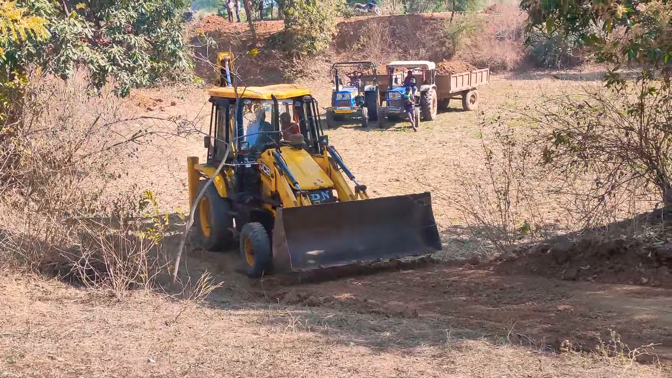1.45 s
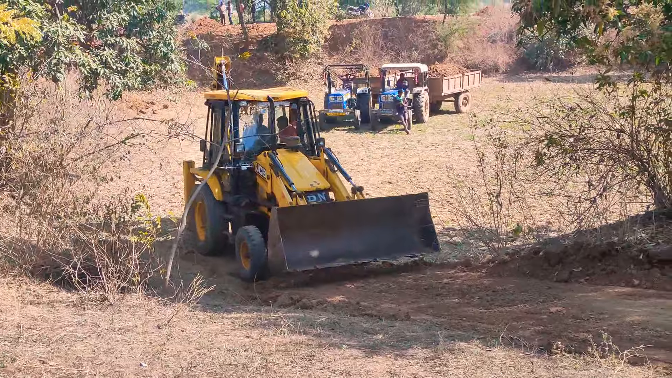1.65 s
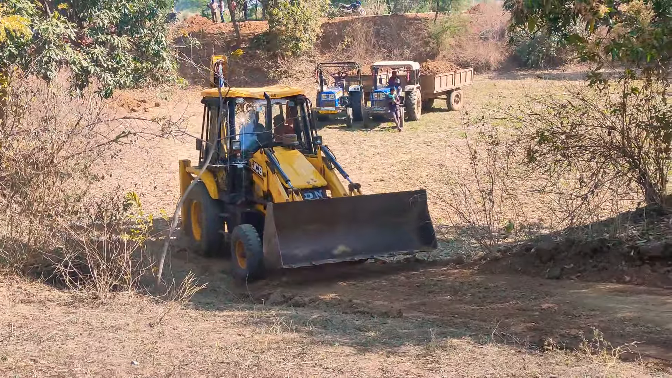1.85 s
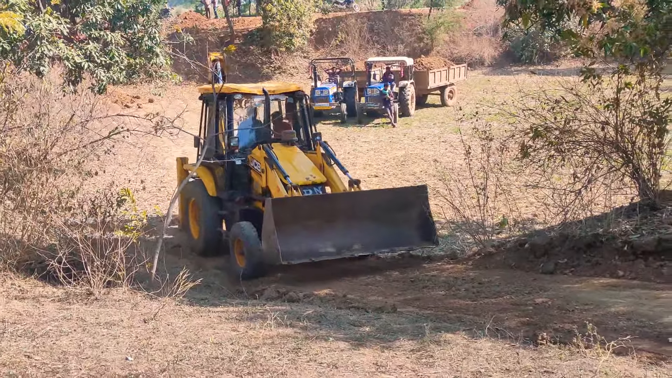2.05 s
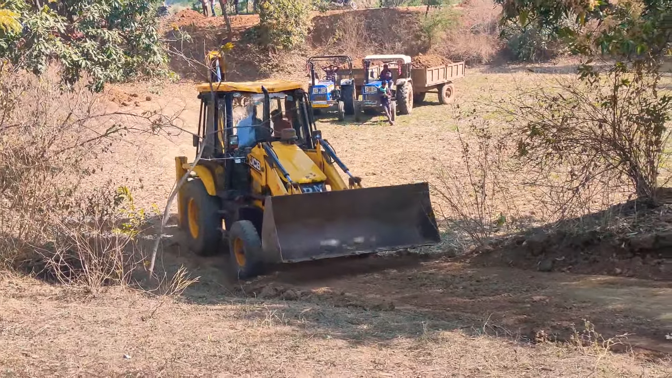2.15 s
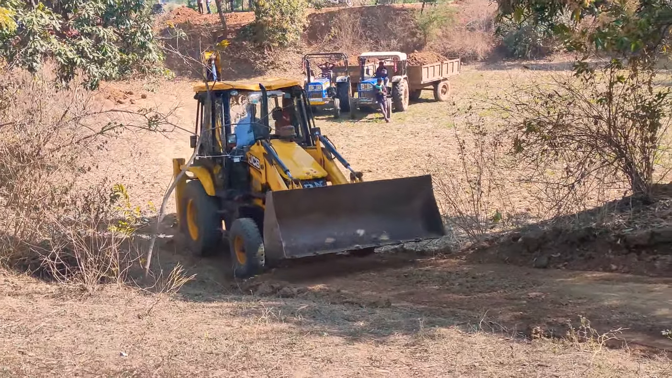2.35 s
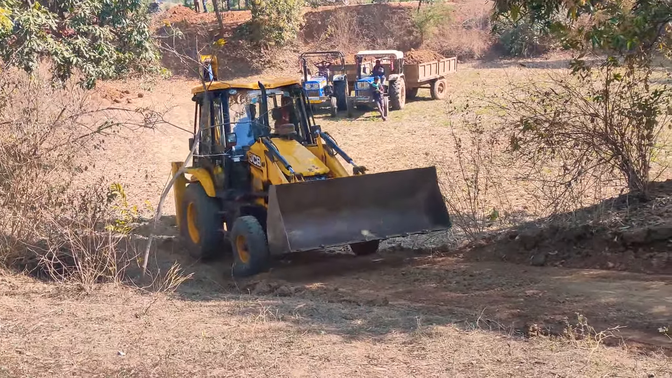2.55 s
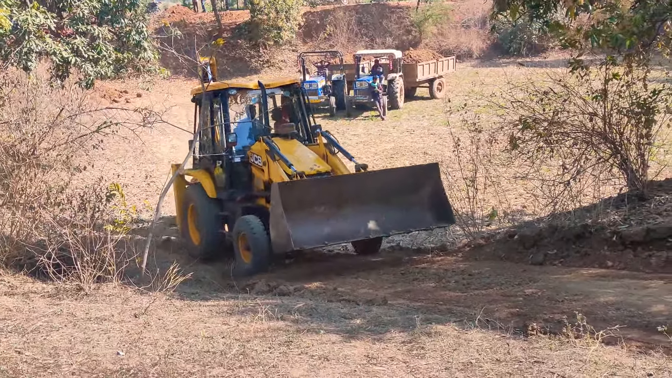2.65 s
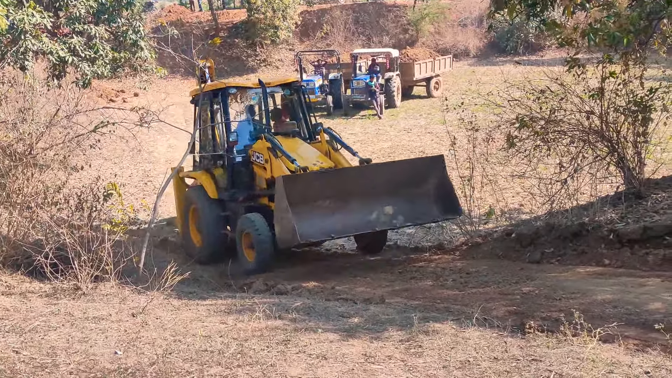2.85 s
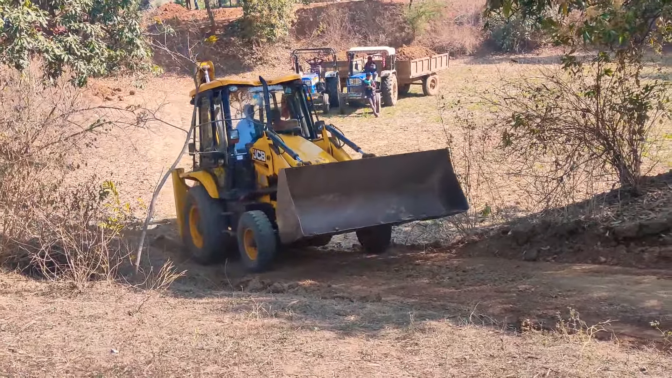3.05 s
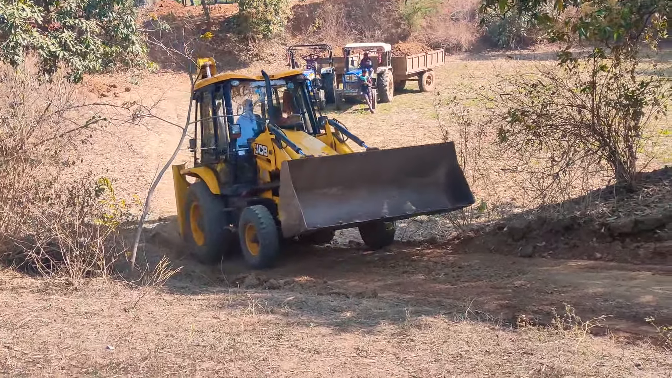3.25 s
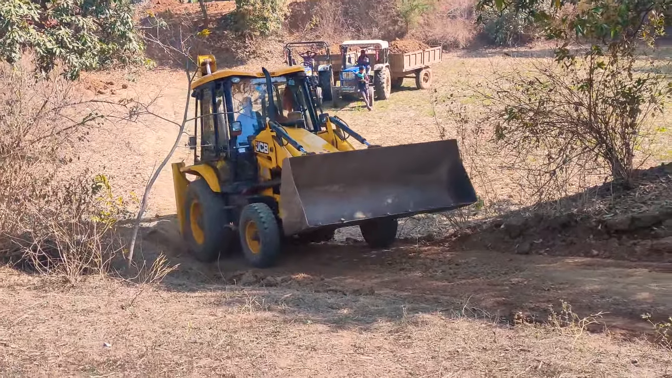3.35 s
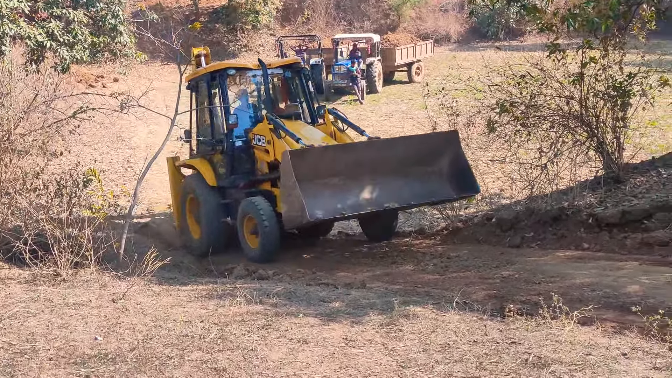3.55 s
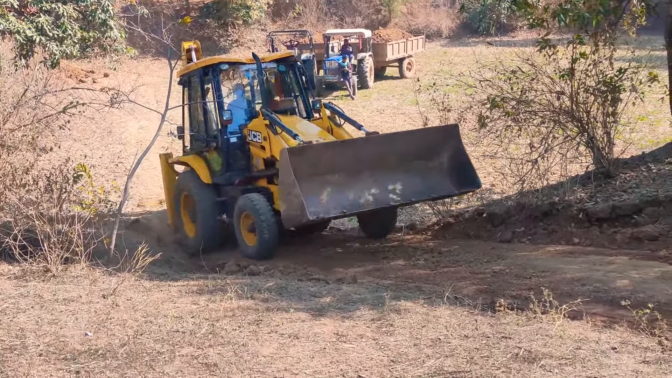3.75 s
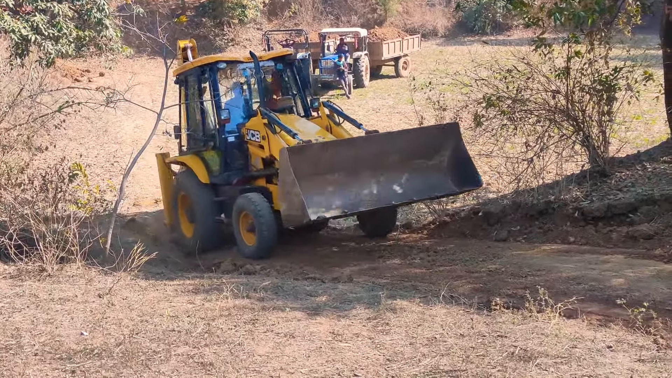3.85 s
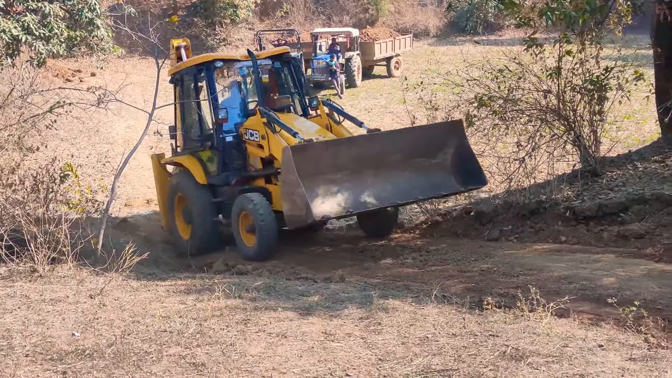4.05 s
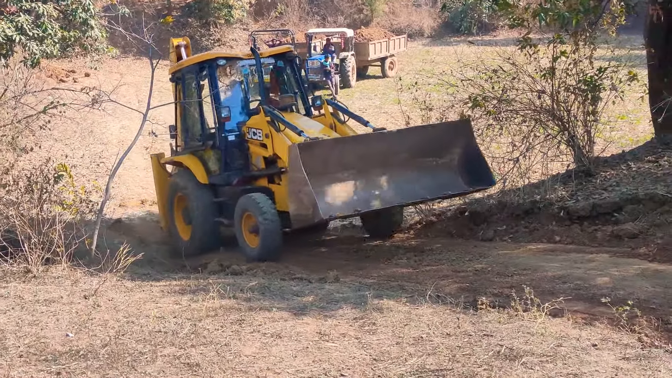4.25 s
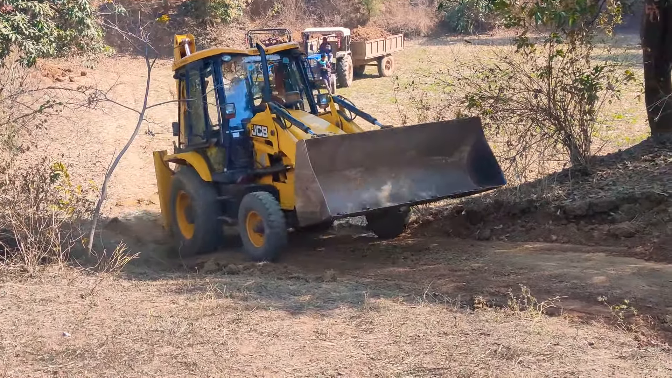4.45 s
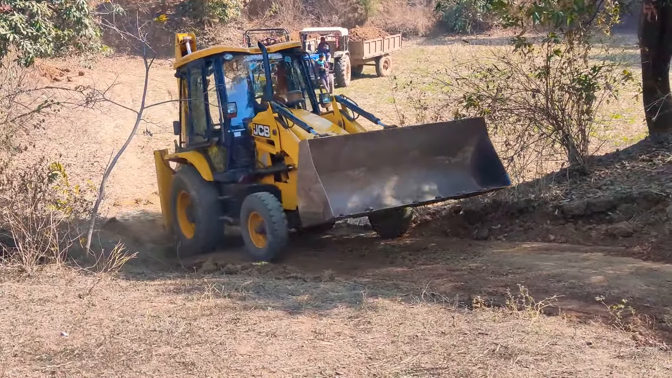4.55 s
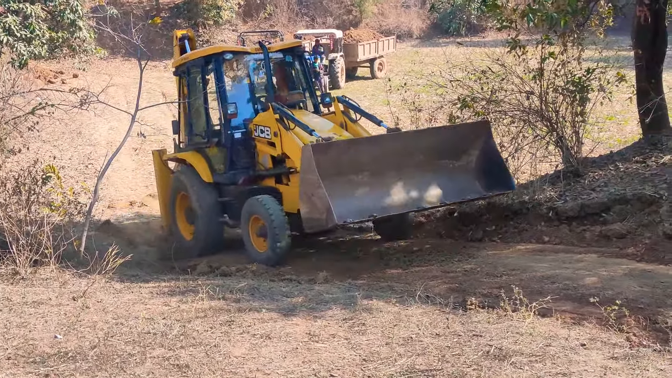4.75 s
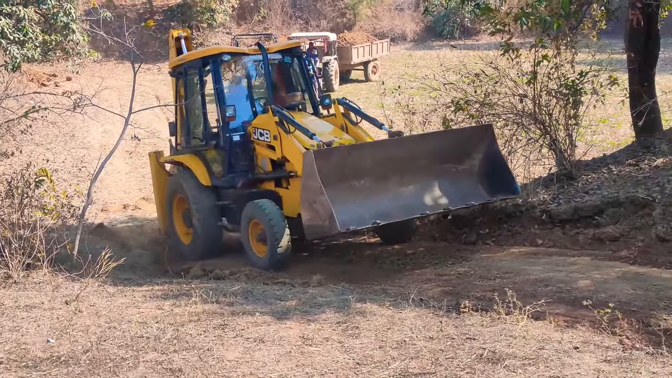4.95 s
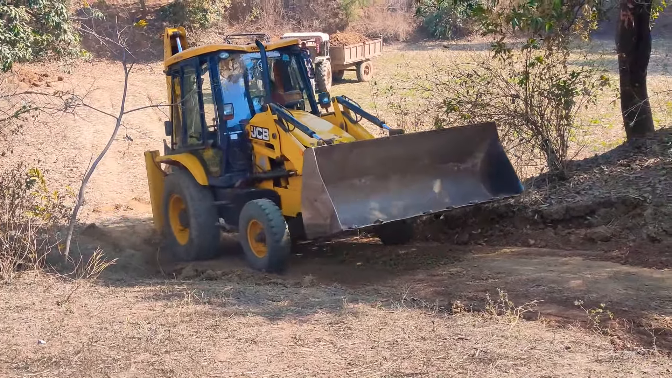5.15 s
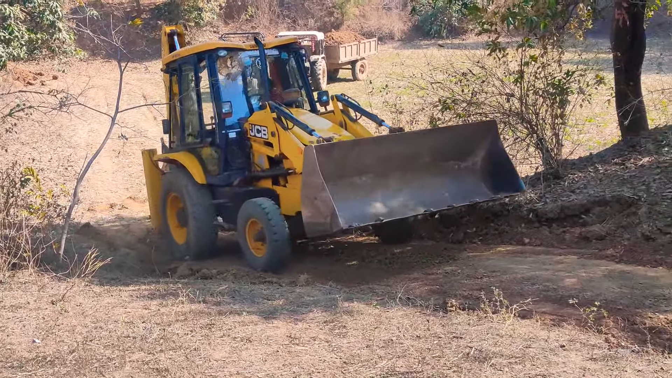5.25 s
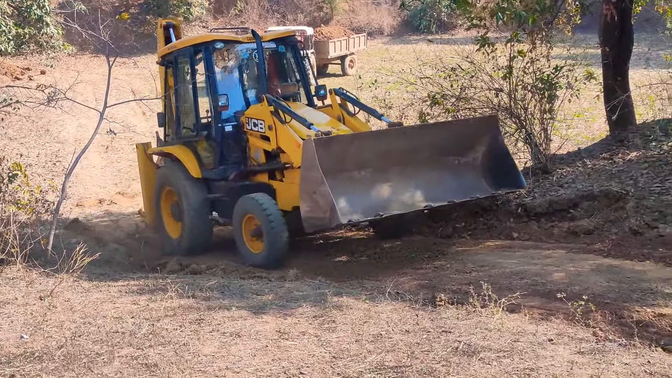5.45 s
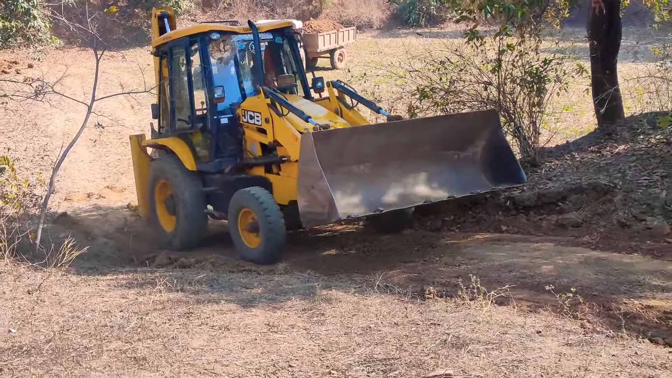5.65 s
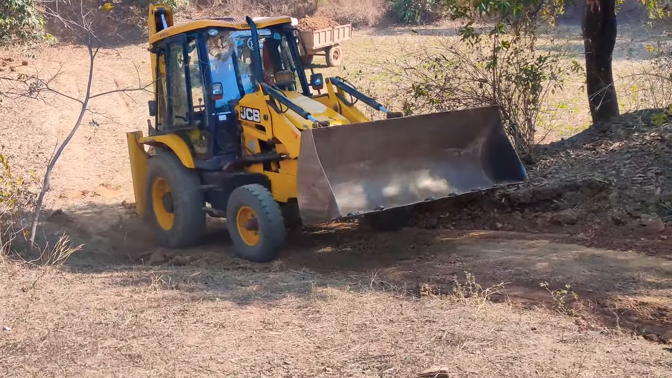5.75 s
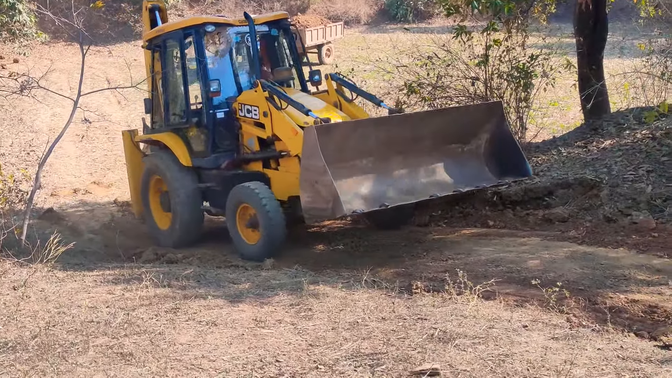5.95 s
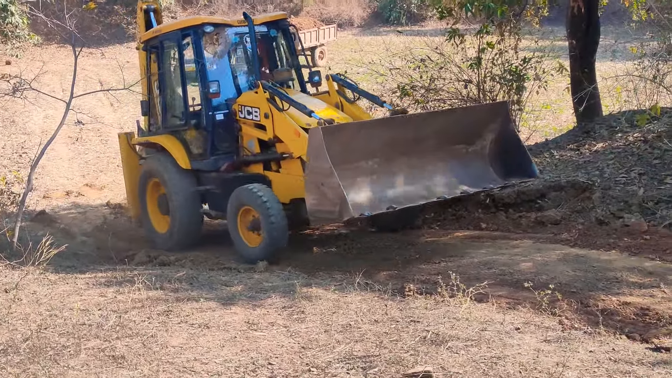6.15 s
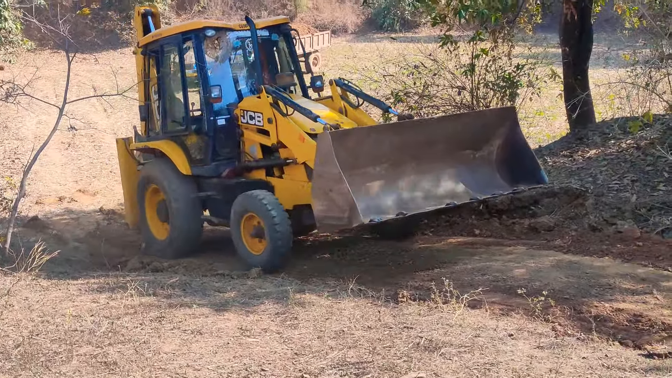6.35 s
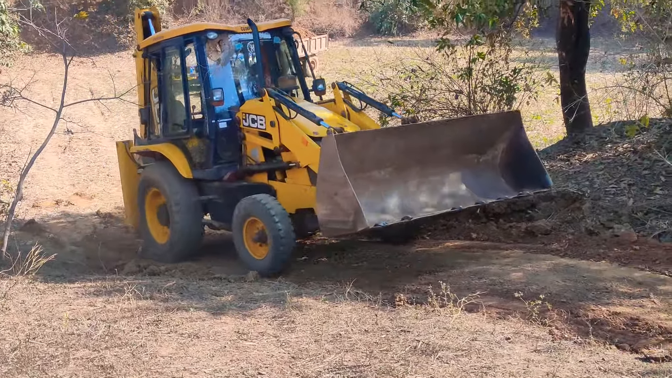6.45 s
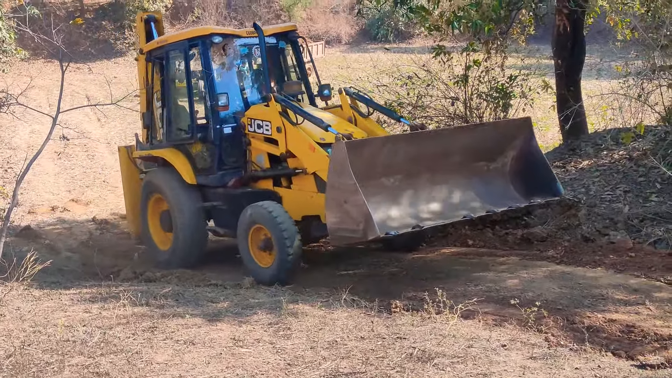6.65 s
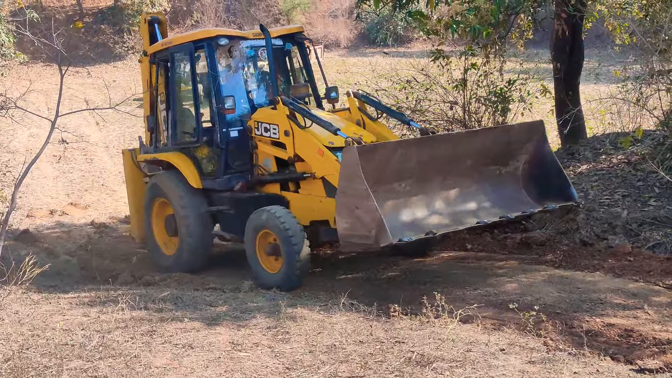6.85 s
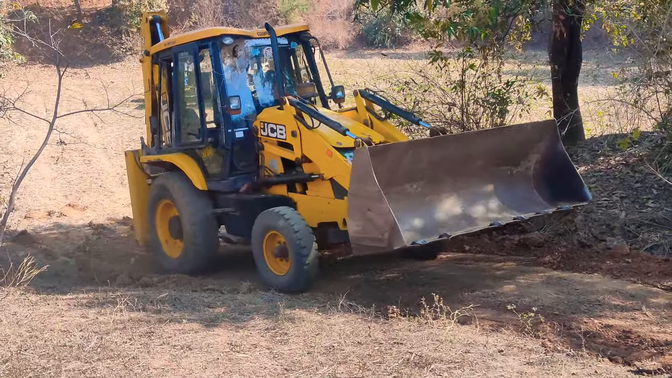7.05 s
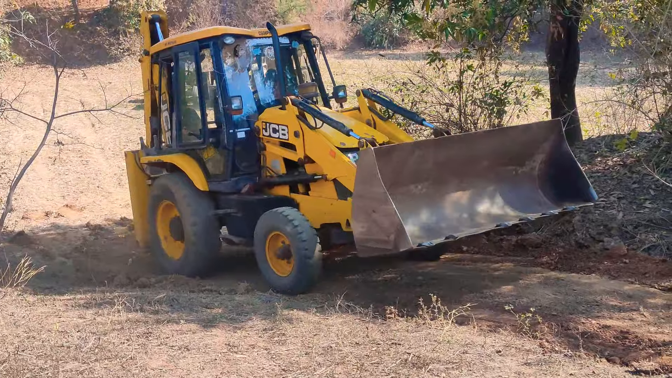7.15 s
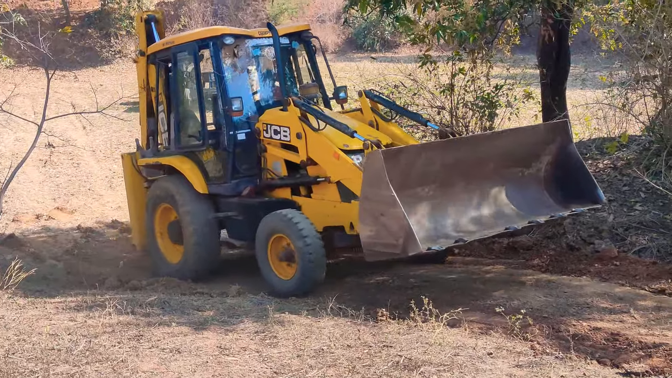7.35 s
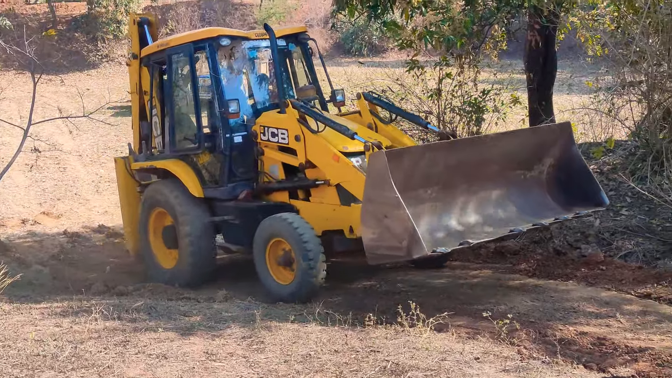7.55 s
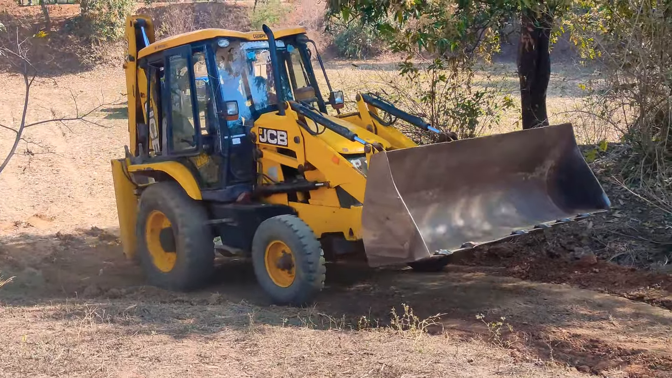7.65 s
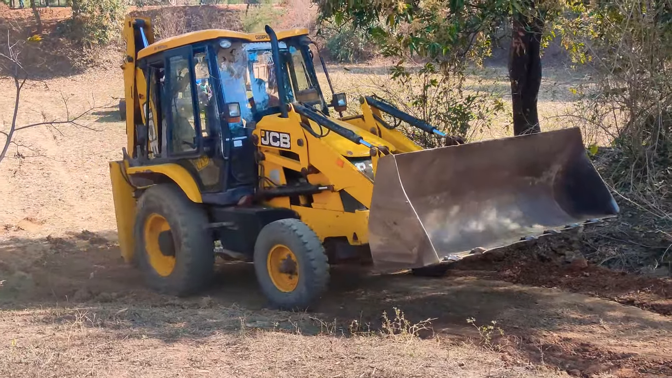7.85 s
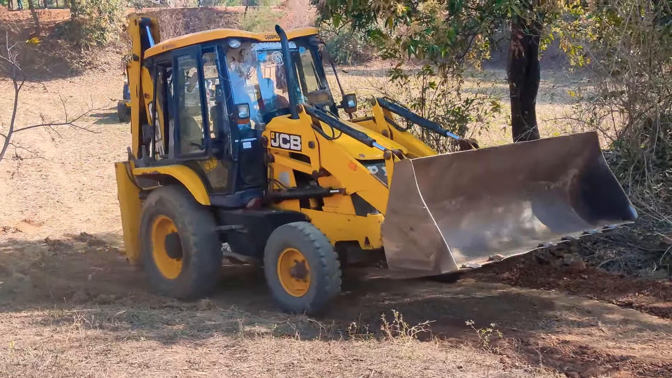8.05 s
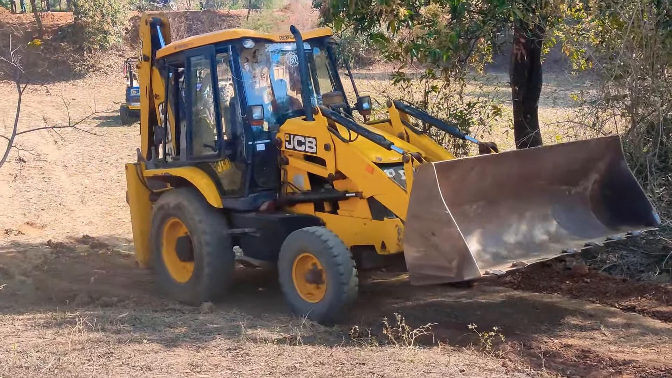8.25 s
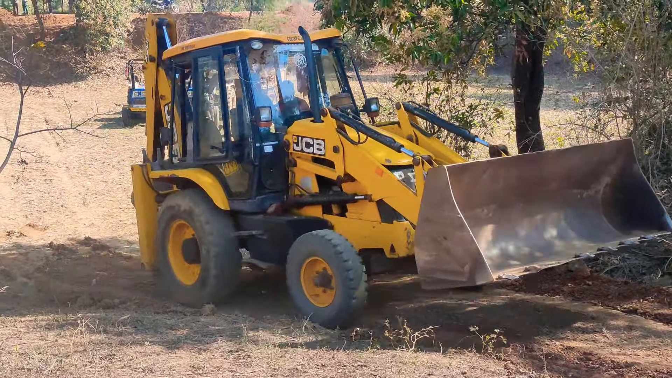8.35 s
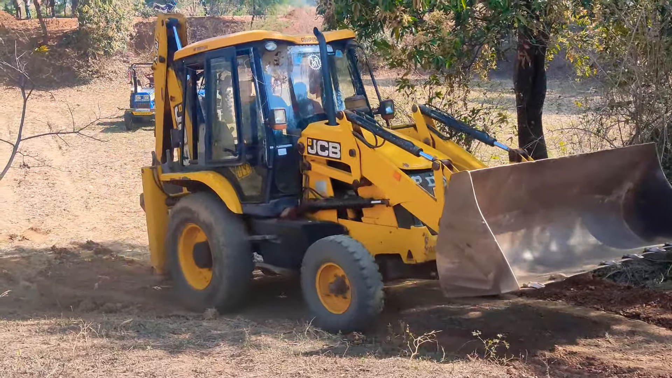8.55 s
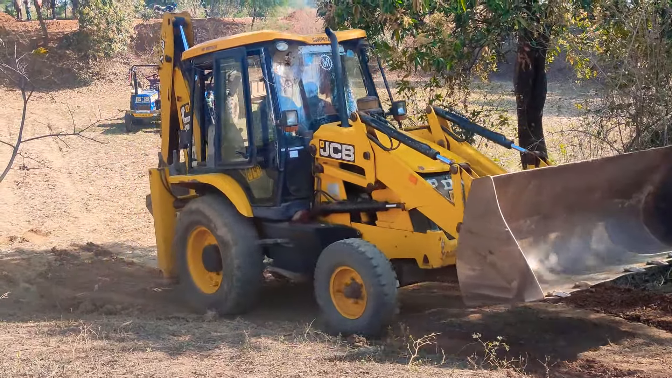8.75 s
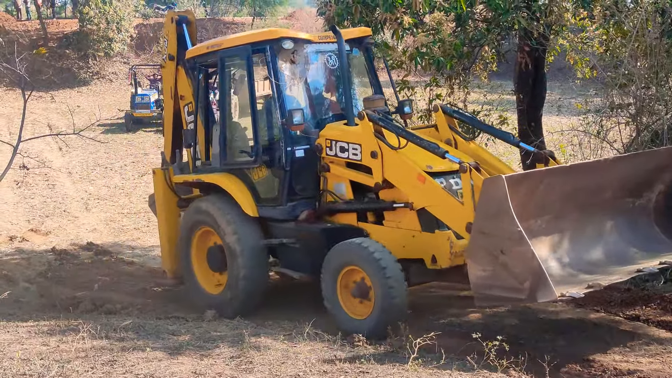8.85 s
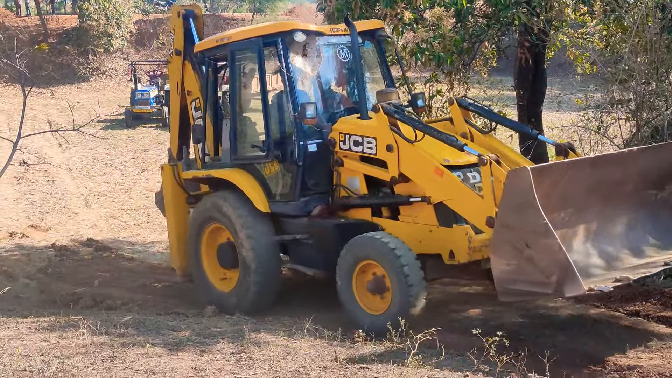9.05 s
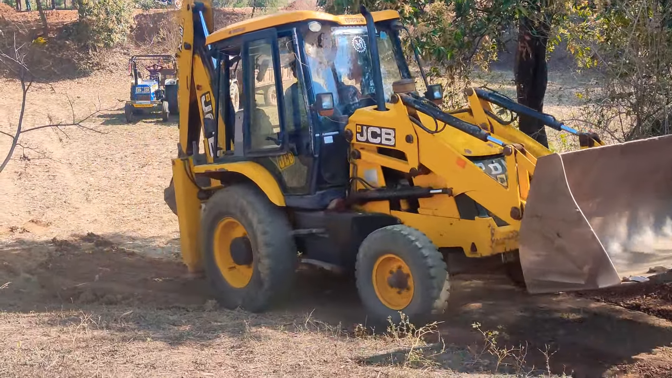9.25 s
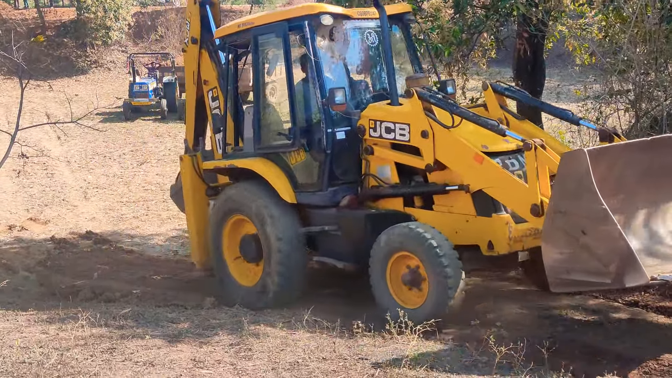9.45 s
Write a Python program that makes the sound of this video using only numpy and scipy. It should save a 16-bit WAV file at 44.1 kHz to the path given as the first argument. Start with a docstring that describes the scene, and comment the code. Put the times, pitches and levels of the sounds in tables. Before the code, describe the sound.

A heavy diesel machine approaches across open ground. The engine climbs to a peak about three and a half seconds in, with a faint fan whine, then settles slightly and holds a fast, rough chug. Clatter, hissy valve noise and loose-metal rattling grow as it nears and turns side-on. Occasional brittle twig snaps sit close to the handheld-like microphone; low bass is filtered out and there is no speech.

```python
"""Backhoe loader nearing over a dry field

A four-cylinder diesel revs up and settles under load as the machine nears and turns its side to the listener.
Uneven firing forces excite resonant casing, panels and bonnet; mode balance follows the side in view.
Damped modes make the hard knocks, casing throbs, clanks of a loose panel and ticks of a loose pin.
A sine on the crankshaft phase makes the fan tone; decaying noise makes dry twigs snap close by."""
import sys
import numpy as np
from scipy import signal
from scipy.fft import rfft, irfft
from scipy.io import wavfile
from scipy.ndimage import uniform_filter1d

SR = 44100
rng = np.random.default_rng(int(sys.argv[2]) if len(sys.argv) > 2 else 0)


def bounce(signal):
    """Save signal as a 16-bit WAV file at the path given by the first command-line argument."""
    frames = np.transpose(np.atleast_2d(signal))
    limited = np.clip(frames, -1, 1)
    pcm = np.round(limited * 32767).astype(np.int16)
    wavfile.write(sys.argv[1], SR, pcm)


N = 418068
TIME = np.arange(N) / SR
TAPS = 4096   # length of every impulse response in samples
HZ = np.maximum(np.arange(TAPS // 2 + 1) * SR / TAPS, 1)
WORKING_SPEED = 55   # firings per s

# engine speed: t/s, firing rate f/Hz
FIRING = [(0.0, 43.88), (0.6, 44.56), (0.9, 48.51), (1.8, 51.55), (2.4, 55.97), (2.7, 56.51), (3.0, 59.01),
          (3.6, 60.47), (3.9, 58.99), (4.2, 60.47), (5.1, 54.96), (5.7, 53.29), (6.6, 54.23), (8.1, 54.73),
          (8.7, 55.2), (9.48, 57.24)]
# side that the machine shows: t/s, aspect (0 head-on, 1 oblique, 2 side-on; held at 2 above that)
ASPECT = [(0, .02), (2.3, 0.14), (3.2, 0.75), (4.4, 1.52), (5.4, 1.69), (6.4, 2.06), (8.4, 2.34),
          (9.4, 1.43)]
# the four cylinders in firing order: relative force in the boom/dB, relative force in the other voices/dB
CYLINDERS = [(1, 2.5), (-4, -3.5), (-0.5, -1), (0.5, 1.5)]
# each engine voice at working speed, full load and 10 m: level head-on/dB, oblique/dB, side-on/dB,
# level per extra firing per s/dB, level lost without load/dB
VOICES = { "exhaust": (-32, -35.5, -33.5, 0.54, 1.5), "boom": (-24.5, -23.5, -22.5, 0.48, 3.5),
          "clatter": (-29, -32, -30.5, 0.39, 0), "hiss": (-39, -36.5, -37, 0.02, 4.5),
          "bonnet": (-34, -33.5, -34.5, 0.91, 7.5), }
# the hardest knocks: t/s, thud relative level/dB, thud f/Hz, panel relative level/dB,
# delay of the ring/s, ring relative level/dB, ring f/Hz
HARD_KNOCKS = [(1.9026, -23.5, 535, -40.5, 0.023, -29.5, 535),
               (2.069, -24.5, 635, -33.0, 0.011, -24.0, 580),
               (2.2897, -21.5, 560, -31.5, 0.011, -29.5, 495),
               (2.3482, -22.0, 550, -35.0, 0.022, -30.5, 570),
               (2.4017, -22.0, 575, -33.5, 0.011, -29.5, 565),
               (2.5431, -20.5, 550, -32.5, 0.013, -29.0, 565),
               (2.9934, -17.0, 555, -31.0, 0.016, -26.0, 550),
               (3.4658, -17.5, 520, -27.5, 0.018, -23.5, 570),
               (3.5296, -17.5, 615, -31.0, 0.011, -22.5, 580),
               (3.5996, -15.5, 540, -35.5, 0.018, -22.0, 580),
               (3.6666, -17.0, 555, -31.0, 0.017, -21.5, 565),
               (3.7968, -14.5, 535, -28.0, 0.011, -20.5, 560),
               (4.0011, -14.5, 540, -31.0, 0.017, -23.5, 585),
               (4.3334, -14.5, 555, -24.0, 0.02, -21.5, 585), (4.4675, -14.0, 595, -30.5, 0.02, -24.5, 535),
               (4.5375, -16.5, 550, -24.5, 0.011, -16.0, 590),
               (4.7982, -16.0, 565, -32.0, 0.023, -21.5, 530),
               (5.2488, -16.0, 550, -29.5, 0.021, -23.5, 560),
               (5.395, -16.0, 555, -29.0, 0.023, -20.0, 580),
               (5.6003, -18.0, 585, -33.5, 0.022, -16.5, 540),
               (5.694, -15.5, 500, -21.5, 0.011, -22.5, 545),
               (5.8279, -16.5, 560, -24.5, 0.019, -19.0, 550),
               (5.9935, -11.5, 575, -28.0, 0.011, -16.5, 585),
               (6.0682, -14.0, 560, -27.0, 0.014, -18.0, 580),
               (6.1423, -16.0, 570, -28.0, 0.021, -21.0, 550),
               (6.3721, -16.5, 600, -28.5, 0.012, -20.0, 595),
               (6.4391, -15.5, 630, -17.5, 0.011, -18.5, 585),
               (6.5137, -14.5, 605, -23.0, 0.012, -17.5, 590),
               (6.5868, -13.5, 565, -26.5, 0.023, -21.0, 565),
               (6.8815, -14.5, 585, -23.0, 0.018, -19.5, 595),
               (7.2512, -12.5, 575, -21.0, 0.018, -19.5, 580),
               (7.3259, -15.0, 575, -27.5, 0.022, -20.0, 600),
               (7.3956, -13.5, 570, -27.0, 0.023, -21.5, 585),
               (7.4696, -15.5, 560, -22.0, 0.011, -22.5, 585),
               (7.6264, -14.5, 590, -33.5, 0.011, -20.5, 585),
               (7.8349, -15.5, 610, -21.5, 0.015, -17.0, 585),
               (7.9821, -8.0, 570, -25.5, 0.017, -15.5, 600),
               (8.1291, -14.0, 615, -21.5, 0.012, -14.0, 600),
               (8.2745, -12.5, 595, -29.0, 0.013, -19.5, 590),
               (8.3502, -15.5, 595, -19.0, 0.018, -16.0, 600),
               (8.4212, -15.0, 600, -20.0, 0.013, -19.0, 590),
               (8.5658, -11.0, 570, -24.5, 0.014, -19.5, 575),
               (8.6454, -14.5, 625, -22.5, 0.011, -22.0, 610),
               (8.7831, -10.5, 570, -26.5, 0.023, -18.0, 590),
               (8.8564, -11.0, 595, -26.5, 0.017, -19.5, 595),
               (9.0701, -14.5, 575, -29.0, 0.017, -14.5, 585),
               (9.3528, -11.5, 580, -24.5, 0.02, -19.5, 610),
               (9.4232, -12.0, 535, -32.0, 0.017, -18.0, 600)]
# swells of the casing: t/s, length/s, peak level/dB, f/Hz
THROBS = [(0.625, 0.02, -28.5, 570), (0.652, 0.018, -30, 570), (0.714, 0.03, -29.5, 565),
          (1.806, 0.011, -23.5, 570), (1.846, 0.018, -26, 570), (1.992, 0.013, -24.5, 570),
          (2.016, 0.013, -24, 580), (2.215, 0.026, -24.5, 540), (2.611, 0.014, -24.0, 580.0),
          (2.652, 0.016, -24.5, 585.0), (2.923, 0.017, -24.0, 545.0), (3.06, 0.013, -19.5, 540.0),
          (3.268, 0.014, -20.5, 575.0), (3.932, 0.016, -20.0, 575.0), (4.197, 0.015, -21.0, 550.0),
          (4.414, 0.015, -20.5, 580.0), (4.603, 0.013, -18.5, 535.0), (4.677, 0.02, -18.5, 595.0),
          (4.742, 0.028, -19.0, 525.0), (4.815, 0.029, -20.5, 575.0), (4.937, 0.013, -19.5, 560.0),
          (4.957, 0.029, -21.0, 585.0), (5.01, 0.013, -21.5, 575.0), (5.173, 0.027, -19.0, 585.0),
          (5.322, 0.016, -20.5, 580.0), (5.468, 0.019, -19.0, 610.0), (5.512, 0.016, -21.0, 605.0),
          (5.541, 0.02, -21.0, 590.0), (6.197, 0.014, -18.5, 565.0), (6.28, 0.026, -20.0, 540.0),
          (6.699, 0.025, -18.5, 605.0), (7.084, 0.027, -19.5, 585.0), (7.147, 0.038, -16.0, 575.0),
          (7.668, 0.013, -19.5, 605.0), (7.69, 0.018, -15.0, 605.0), (8.177, 0.019, -18.5, 555.0),
          (8.244, 0.013, -18.0, 590.0), (8.605, 0.014, -17.5, 615.0), (8.717, 0.014, -17.5, 590.0),
          (8.917, 0.019, -14.5, 590.0), (9.156, 0.014, -17.0, 595.0), (9.189, 0.018, -15.5, 600.0),
          (9.225, 0.015, -17.0, 595.0), (9.256, 0.043, -17.5, 600.0)]
# rattle of the loose pin, its main pitch shifting as it seats in its bush: t/s, level/dB, main f/Hz
PIN_LEVEL = [(0, -72, 2950), (2.8, -61, 2950), (3.2, -50, 2950), (3.8, -52, 3010), (4.2, -59, 3020),
             (4.7, -56, 3030), (5.1, -62, 2960), (5.6, -59, 2890), (6.1, -60, 2900), (6.45, -50, 2930),
             (6.75, -55, 2990), (7.05, -50.5, 2950), (7.7, -55, 2960), (8.1, -48.5, 2970), (8.5, -46, 2950),
             (8.85, -50.5, 3030), (9.1, -62, 3060), (9.35, -48, 3110)]


def exhaust(firings):
    """Overlapping pressure pulses drive silencer resonances: soft puffs merge into a drone."""
    # f/Hz, width/Hz, relative level head-on/dB, oblique/dB, side-on/dB (head-on f is lowered in modes_gain)
    exhaust_modes = [(326.5, 59, 2.5, -1, -2.5), (338, 46, -24, -8, 1), (409, 114, -4.5, -10.5, 4.5)]
    cylinder_db = np.array(CYLINDERS)[:, 1]
    force = strokes(firings, cylinder_db, lead=0.086, rise=0.15, decay=0.46, between=1.0, uneven_db=5.5)
    return radiate(force * contacts(firings, repeat=0.42, apart=0.011), exhaust_modes)


def boom(firings):
    """Amplitude modulation of casing resonance: a chug near 600 Hz, one lump to a firing."""
    # f/Hz, width/Hz, relative level head-on/dB, oblique/dB, side-on/dB (head-on f is lowered in modes_gain)
    casing_modes = [(475, 52, -12.5, -2.5, -8), (553, 99, -7, 1, -6), (606.7, 61, -5.5, 2.5, 3),
                    (724, 270, -17.5, -29, -18.5)]
    ring = radiate(contacts(firings, repeat=0.52, apart=0.0086), casing_modes)
    # compress the random swells so that the beat stands out
    power = uniform_filter1d(np.mean(ring ** 2, axis=0), size=SR // 90)
    steady = ring / (power + 1e-6) ** .33
    cylinder_db = np.array(CYLINDERS)[:, 0]
    beat = strokes(firings, cylinder_db, lead=0.42, rise=0.4, decay=0.5, between=0.05, uneven_db=2.0)
    return spent_on_blows(depth_db=-8) * evened(steady * beat)


def clatter(firings):
    """Forced vibration of panels: sharp combustion blows excite many plate modes."""
    # f/Hz, width/Hz, relative level head-on/dB, oblique/dB, side-on/dB (head-on f is lowered in modes_gain)
    panel_modes = [(1042, 124, -3.5, -13, 3.5), (1238, 77, -0.5, 0.5, -4.5), (1400, 500, -6.5, -1, -11),
                   (1650, 140, -16, -28, -9), (1776, 210, -13, -5.5, -29), (1893, 200, -13.5, -21, -7),
                   (2214, 240, -14, -12, -17.5), (2600, 75, -22, -23, -28), (3010, 220, -29, -19, -18.5),
                   (3060, 1900, -22, -35, -30.5), (876, 300, -4.5, -4, -19)]
    cylinder_db = np.array(CYLINDERS)[:, 1]
    force = strokes(firings, cylinder_db, lead=0.48, rise=0.21, decay=0.34, between=0.36, uneven_db=2.0)
    return radiate(force * contacts(firings, repeat=0.41, apart=0.029), panel_modes)


def hiss(firings):
    """Impact noise of injectors and valve gear; air absorption takes less of the very top as the way shortens."""
    # f/Hz, relative spectral level/dB
    hiss_spectrum = [(2500, 2), (3900, -4.5), (4600, -5.5), (5200, -10.5), (6000, -4), (6700, -1),
                     (7700, -6.5), (9000, -13.5), (11000, -20.5), (13500, -16), (15500, -10)]
    cylinder_db = np.array(CYLINDERS)[:, 1]
    force = strokes(firings, cylinder_db, lead=0.31, rise=0.23, decay=0.19, between=0.3, uneven_db=2.4)
    ring = scattered(impulse_response(spectrum_gain(hiss_spectrum)), scatter_db=-13, scatter_s=.008)
    sound = evened(through(force * contacts(firings, repeat=1.0, apart=1.0), ring))
    top = signal.sosfiltfilt(signal.butter(2, 10500, "high", fs=SR, output="sos"), sound)
    top_gain = from_db(np.interp(TIME, [0, 7, 9.4], [-1, .5, 3.5]))
    return sound + top * (top_gain - 1)


def bonnet(firings):
    """Lightly damped sheets in forced vibration; their modes glide as the machine turns."""
    # width/Hz, f head-on/Hz, f oblique/Hz, f side-on/Hz, relative level head-on/dB, oblique/dB, side-on/dB
    bonnet_modes = [(46.5, 790, 845, 830, 0, -4.5, -4), (50.4, 978, 1030, 995, 0, -4, -6.5),
                    (45, 1180, 1075, 1068, -11, -9, -10)]
    cylinder_db = np.array(CYLINDERS)[:, 1]
    beat = strokes(firings, cylinder_db, lead=0.7, rise=0.2, decay=0.35, between=0.4, uneven_db=2.0)
    force = beat * contacts(firings, repeat=0.54, apart=0.035)
    aspect, out = in_time(ASPECT)[0], 0
    for width, *views in bonnet_modes:
        hz, db = [np.interp(aspect, np.arange(3), column) for column in np.reshape(views, (2, -1))]
        sheet = sliding(sliding(force, hz, width), hz, width)
        out = out + from_db(db) * evened(sheet)
    return out


def spent_on_blows(depth_db):
    """Energy sharing: a firing that knocks or throbs hard leaves less for the ordinary beat (returns a gain)."""
    busy = np.zeros(N)
    spans = [(s - .012, late + .02) for s, _, _, _, late, *_ in HARD_KNOCKS]
    spans += [(s - .005, length + .01) for s, length, *_ in THROBS]
    for s, length in spans:
        busy[int(s * SR):int((s + length) * SR)] = 1
    return from_db(depth_db * uniform_filter1d(busy, size=SR // 150))


def knocks(firings, thud_rise_s, ring_s, thud_gain_db, ring_gain_db, panel_gain_db):
    """Impact excitation: a short, dull thud clanks the loose panel, then the casing rings on."""
    panel_hz = 1090
    out = np.zeros(N)
    for s, thud_db, thud_hz, panel_db, late, ring_db, ring_hz in knock_events(firings):
        add(out, s, struck(thud_db + thud_gain_db, thud_hz, thud_rise_s))
        add(out, s, clank(panel_db + panel_gain_db, panel_hz * (1 + 0.06 * rng.standard_normal())))
        # a swell peaks in the middle of three lengths
        add(out, s + late - 3 * ring_s / 2, swell(ring_db + ring_gain_db, ring_hz, ring_s))
    return out


def knock_events(firings):
    """Random excitation: lighter knocks fall by chance on the beat, clear of the listed hard ones."""
    # cylinders in firing order: chance head-on, chance from the oblique view onwards
    knock_chance = [(.2, .15), (.05, .02), (0.75, .02), (.08, .08)]
    lead = 0.2503   # firing intervals
    over_boom_db, spread_db, speed_db = 3, 5, 0.2   # speed_db is per extra firing per s
    panel_db, ring_db = -17, -14   # against the thud
    knock_hz, ring_late_s = 538, 0.01211
    number = (firings + lead).astype(int)
    at = np.flatnonzero(np.diff(number)) + 1
    luck = rng.random(size=1024)[number[at]]
    size = rng.standard_normal(size=1024)[number[at]]
    head_on, turned = np.array(knock_chance)[number[at] % 4].T
    chance = head_on + (turned - head_on) * np.clip(in_time(ASPECT)[0][at], 0, 1)
    hard_s = np.array(HARD_KNOCKS)[:, 0]
    free = np.abs(TIME[at, None] - hard_s).min(axis=1) > 1 / WORKING_SPEED
    db = level_db("boom")[at] + over_boom_db + spread_db * size
    db = db + speed_db * (in_time(FIRING)[0][at] - WORKING_SPEED)
    light = np.broadcast_arrays(TIME[at], db, knock_hz, db + panel_db, ring_late_s, db + ring_db, knock_hz)
    return np.vstack([HARD_KNOCKS, np.column_stack(light)[free & (luck < chance)]])


def throbs(gain_db):
    """Resonance: some firings catch the casing and make it swell."""
    out = np.zeros(N)
    for s, length, db, hz in THROBS:
        add(out, s - length, swell(db + gain_db, hz, length))
    return out


def clanks(gain_db):
    """Repeated impact: the loose panel is thrown against its frame at listed times."""
    # t/s, relative level/dB, f/Hz
    clank_events = [(2.8582, -28.0, 1105.0), (3.131, -28.0, 1155.0), (3.1999, -28.5, 1145.0),
                    (3.8429, -28.5, 1180.0), (3.9294, -28.5, 1230.0), (4.0709, -27.5, 1160.0),
                    (4.138, -27.5, 1090.0), (4.2014, -26.5, 1135.0), (4.2525, -25.0, 1150.0),
                    (4.6714, -28.0, 1035.0), (4.8857, -27.5, 1050.0), (4.955, -25.0, 1065.0),
                    (5.0304, -27.0, 1240.0), (5.0667, -26.5, 1060.0), (5.1042, -23.5, 1095.0),
                    (5.284, -24.5, 1080.0), (5.3578, -27.0, 1070.0), (5.4685, -26.0, 1060.0),
                    (5.5426, -24.0, 1040.0), (5.6171, -26.5, 1155.0), (5.6776, -26.0, 1070.0),
                    (5.8415, -23.0, 1075.0), (5.9181, -26.0, 1135.0), (6.0308, -25.0, 1060.0),
                    (6.2141, -24.5, 1075.0), (6.3276, -23.5, 1090.0), (6.4021, -24.0, 1075.0),
                    (6.6589, -21.5, 1075.0), (6.7179, -22.5, 1035.0), (6.773, -23.5, 1065.0),
                    (6.8058, -22.0, 1080.0), (6.9539, -19.0, 1045.0), (7.027, -22.5, 1125.0),
                    (7.0651, -19.5, 1100.0), (7.2333, -24, 1070), (7.5055, -21.5, 1030.0),
                    (7.617, -21.5, 1100), (7.6512, -19.0, 1080.0), (7.7627, -22.5, 1085.0),
                    (7.7964, -22.5, 1045.0), (7.8736, -22.5, 1040.0), (7.9089, -20.5, 1065.0),
                    (7.9444, -21.5, 1105.0), (8.0547, -22.5, 1090.0), (8.2904, -22.5, 1105.0),
                    (8.4904, -22.0, 1050.0), (8.635, -20.0, 1090.0), (8.709, -24.0, 1055.0),
                    (9.0121, -25.5, 1055.0), (9.1374, -21.0, 1085.0), (9.2432, -26.5, 1130.0),
                    (9.3938, -26.0, 1050.0), (9.4356, -25.5, 1165.0)]
    out = np.zeros(N)
    for s, db, hz in clank_events:
        add(out, s, clank(db + gain_db, hz))
    return out


def clank(db, hz):
    """Modal superposition: one hit of the loose panel sums damped partials, round and hollow."""
    # frequency ratio to the main pitch, relative level/dB
    clank_modes = [(1, 0), (1.12, -13), (1.8, -19), (2.8, -27)]
    return sum(struck(db + mode_db, hz * ratio, rise_s=0.0025) for ratio, mode_db in clank_modes)


def struck(db, hz, rise_s):
    """Heavy damping: a mode swells to its peak and quickly dies."""
    age = TIME[:SR // 20]
    envelope = (age / rise_s * np.exp(1 - age / rise_s)) ** 1.4
    return from_db(db) * envelope * np.sin(2 * np.pi * (hz * age + rng.random()))


def swell(db, hz, length_s):
    """Phase-modulated resonance: a rounded, slightly unsteady ring in the middle of three times its length."""
    age = TIME[:int(3 * length_s * SR)] - 1.5 * length_s
    wobble = np.interp(age, np.linspace(-.08, .08, 32), rng.standard_normal(32))
    envelope = np.exp(-.4 * np.abs(2 * age / length_s) ** 3)
    return from_db(db) * envelope * np.sin(2 * np.pi * (hz * age + rng.random()) + .45 * wobble)


def pin(firings, share, uneven_db, late_s, width_hz, upper_db):
    """Impulse excitation: some firings shake a loose pin in the loader arm, whose modes answer with a tick."""
    # upper modes: f/Hz, width/Hz, relative level/dB
    pin_modes = [(3050, 52, 8), (3400, 160, -9), (3980, 100, -13), (6400, 310, -12), (7280, 230, -7)]
    at = np.flatnonzero(np.diff(firings.astype(int)))
    chance, size, delay = rng.random((len(at), 3)).T
    tick_at = np.minimum(at + (delay * late_s * SR).astype(int), N - 1)
    ticks = np.zeros(N)
    ticks[tick_at] = (chance < share) * from_db(uneven_db * size)
    upper_gain = sum(from_db(db) / (1 + (2 * (HZ - hz) / width) ** 2) for hz, width, db in pin_modes)
    main_hz = in_time(PIN_LEVEL)[1]
    main = sliding(sliding(ticks + 1e-18, main_hz, width_hz), main_hz, width_hz)
    upper = through(ticks, impulse_response(upper_gain))
    return rms_one(rms_one(main) + from_db(upper_db) * rms_one(upper))


def fan(firings, waver_db):
    """Blade-passing tone: its frequency is locked to the crankshaft and its level wavers a little."""
    blades_per_firing = 21 / 4
    knots = np.arange(0, TIME[-1] + 1, .06)
    waver = from_db(waver_db * np.interp(TIME, knots, rng.standard_normal(len(knots))))
    return np.sqrt(2) * np.sin(2 * np.pi * blades_per_firing * firings) * waver


def snaps(crack_s, rustle_s, grain_db, ring_hz, ring_width_hz, ring_db):
    """Brittle fracture: dry twigs crack in bursts of noise, then a short, grainy rustle rings the stalks."""
    # t/s, relative crack level/dB, rustle level against the crack/dB
    snap_events = [(0.194, -30.5, -23), (0.331, -40, -12), (1.0428, -21, -15.5), (4.057, -27, -18),
                   (5.758, -38, -18)]
    # f/Hz, relative spectral level/dB
    snap_colour = [(300, -3), (1000, 5), (3000, -1), (4400, 2), (5500, 1.5), (7000, 7.5), (10000, -3),
                   (13000, -6), (15500, -2)]
    crack, rustle = np.zeros((2, N))
    for s, db, rustle_db in snap_events:
        start = int(s * SR)
        age = TIME[:N - start][:SR // 2]
        grains = from_db(grain_db * np.interp(age, np.arange(0, .5, .002), rng.standard_normal(250)))
        crack[start:][:len(age)] += from_db(db) * np.exp(-age / crack_s)
        rustle[start:][:len(age)] += from_db(db + rustle_db) * grains * np.exp(-age / rustle_s)
    noise = rng.standard_normal((2, N))
    b, a = signal.iirpeak(ring_hz, ring_hz / ring_width_hz, fs=SR)
    stalks = from_db(ring_db) * signal.lfilter(b, a, rustle * noise)
    return through((crack + rustle) * noise + stalks, impulse_response(spectrum_gain(snap_colour)))


def strokes(firings, cylinder_db, lead, rise, decay, between, uneven_db):
    """Periodic forcing: each firing swells and dies over a steady churn; times are shares of a firing interval."""
    phase = firings + lead + 1
    number, age = np.maximum(phase.astype(int), 1), phase % 1
    count = np.arange(1024)
    unevenness_db = uneven_db * rng.standard_normal(len(count))
    strength = from_db(np.asarray(cylinder_db)[(count - 1) % 4] + unevenness_db)

    def shape(a):
        return (1 - np.exp(-(a / rise) ** 2)) * np.exp(-a / decay)

    # the stroke before is still dying away
    return between + strength[number] * shape(age) + strength[number - 1] * shape(age + 1)


def contacts(firings, repeat, apart):
    """Cyclic correlation: one share of the chatter recurs every four firings; apart is each side's own share."""
    size = 4096
    place = firings / 4 * size % size
    patterns = irfft(np.exp(2j * np.pi * rng.random((2, size // 2 + 1))))
    first, second = [np.interp(place, np.arange(size), rms_one(p)) for p in patterns]
    turn = 1.292 * TIME   # rad; the recurring pattern changes slowly as the machine moves
    repeat, apart = np.clip(repeat, 0, 1), np.clip(apart, 0, 1)
    recurring = first * np.cos(turn) + second * np.sin(turn)
    common = np.sqrt(repeat) * recurring + np.sqrt(1 - repeat) * rng.standard_normal(N)
    return np.sqrt(1 - apart) * common + np.sqrt(apart) * rng.standard_normal((2, N))


def radiate(force, modes):
    """Directivity: the balance of the resonances follows the side in view; slow level 1."""
    aspect, out = np.clip(in_time(ASPECT)[0], 0, 2), 0
    for view in range(3):
        ring = scattered(impulse_response(modes_gain(modes, view)), scatter_db=-9, scatter_s=.005)
        out = out + np.maximum(1 - np.abs(aspect - view), 0) * through(force, ring)
    return evened(out)


def modes_gain(modes, view):
    """Power sum of steep-sided resonance curves in one of the three views."""
    hz = HZ / (0.96 if view == 0 else 1)   # head-on, the peaks sit a little lower
    power = sum(from_db(db[view]) ** 2 / (1 + (2 * (hz - centre) / width) ** 2) ** 2
                for centre, width, *db in modes)
    return np.sqrt(power)


def level_db(voice):
    """Spherical spreading: level falls with distance; speed, load and the side in view set it too."""
    # t/s, load (0 to 1)
    load_curve = [(0.5, 0.44), (.66, 0.76), (1.4, 0.68), (1.8, 1), (3.0, 0.83), (4.3, 0.55), (5.4, 0.38),
                  (6.9, 0.53), (7.8, 0.57), (9.4, 1)]
    # t/s, distance/m
    distance_curve = [(0, 26.5), (2.4, 28.7), (4.2, 16.5), (6.6, 11.2), (9.4, 11.5)]
    *view_db, speed_db, load_db = VOICES[voice]
    speed, load, metres, aspect = [in_time(curve)[0] for curve in (FIRING, load_curve, distance_curve, ASPECT)]
    effort_db = speed_db * (speed - WORKING_SPEED) + load_db * (load - 1)
    return np.interp(aspect, np.arange(3), view_db) + effort_db - 20 * np.log10(metres / 10)


def over_ground(x, width_hz):
    """Interference: the bounce off the ground changes a narrow band that moves with the machine."""
    # t/s, f/Hz, gain in the band/dB (mostly a cut, once a slight boost)
    ground_band = [(0, 1540, -15), (2.4, 1550, -8), (4.3, 1630, -17), (5.5, 1570, -16), (6.6, 1610, -10),
                   (7.6, 1483, 2.5), (9.4, 1440, -6.5)]
    hz, band_db = in_time(ground_band)
    return x - (1 - from_db(band_db)) * sliding(x, hz, width_hz)


def scattered(ring, scatter_db, scatter_s):
    """Scattering: cab, arms and bucket throw back a brief, bright cloud of echoes, made of decaying noise."""
    burst = rng.standard_normal(TAPS) * np.exp(-TIME[:TAPS] / scatter_s)
    cloud = signal.sosfilt(signal.butter(2, 1500, "high", fs=SR, output="sos"), burst)
    cloud = cloud / np.sqrt(np.sum(cloud ** 2))
    return ring + from_db(scatter_db) * signal.fftconvolve(ring, cloud)[:TAPS]


def shaded(right):
    """Interaural differences: the right side comes later, shaded from the treble, at a drifting level."""
    # f/Hz, right minus left level/dB
    shade_curve = [(300, 0.2), (430, -1), (600, -0.25), (1000, -0.5), (1250, -1), (1500, 1), (2400, 0.5),
                   (3200, -5), (4200, -8), (5200, -13), (6700, -21.5), (10000, -16), (15000, -21)]
    # level at the start/dB, level at the end/dB
    drift_db = (-1.7, -0.7)
    lag_s = 0.00013
    shade = irfft(spectrum_gain(shade_curve) * np.exp(-2j * np.pi * HZ * lag_s))
    right = signal.oaconvolve(right, np.roll(shade, TAPS // 2))[TAPS // 2:][:N]
    return right * from_db(np.linspace(*drift_db, N))


def sliding(x, hz, width_hz):
    """Heterodyne resonance: its centre moves from sample to sample; gain about 1 on top."""
    turn, r = np.exp(2j * np.pi * np.cumsum(hz) / SR), np.exp(-np.pi * width_hz / SR)
    return 2 * np.real(turn * signal.lfilter([1 - r], [1, -r], x * turn.conj()))


def impulse_response(gain):
    """Minimum phase: folding the cepstrum gives the causal ring of a gain curve; energy 1."""
    cepstrum = irfft(np.log(gain + 1e-9))
    cepstrum[1:TAPS // 2] *= 2
    cepstrum[TAPS // 2 + 1:] = 0
    ring = irfft(np.exp(rfft(cepstrum)))
    return ring / np.sqrt(np.sum(ring ** 2))


def through(x, ring):
    """Linear filtering: convolve every channel with an impulse response."""
    return signal.oaconvolve(np.atleast_2d(x), ring[None], axes=1)[:, :N]


def spectrum_gain(points):
    """Gain per frequency, with decibels interpolated along log frequency."""
    hz, db = np.transpose(points)
    return from_db(np.interp(np.log(HZ), np.log(hz), db))


def evened(x):
    """Level normalisation: hold the slow power at 1 and leave the beat alone."""
    return x / np.sqrt(uniform_filter1d(np.mean(x ** 2, axis=0), size=SR // 3) + 1e-12)


def rms_one(x):
    """Normalise to an effective value of 1."""
    return x / np.sqrt(np.mean(x ** 2) + 1e-20)


def from_db(db):
    """Amplitude ratio of a level in decibels."""
    return 10 ** (np.asarray(db) / 20)


def in_time(rows):
    """Linear interpolation of each column of a curve at every sample."""
    s, *columns = np.transpose(rows)
    return [np.interp(TIME, s, c) for c in columns]


def add(out, s, sound):
    """Superposition: mix a short sound in at its time."""
    part = out[max(int(s * SR), 0):][:len(sound)]
    part += sound[:len(part)]


def scene():
    """Superposition of the engine's voices on one crankshaft phase, with the twigs, on both sides."""
    # the fan sings out at top speed, while the grille still faces forward: t/s, level/dB
    fan_level = [(0, -62), (2.3, -54), (3.1, -42.5), (3.6, -48), (4.0, -52), (4.35, -48.5), (4.7, -58),
                 (9.4, -55)]
    firings = np.cumsum(in_time(FIRING)[0]) / SR   # crankshaft phase, counted in firings
    gain = {voice: from_db(level_db(voice)) for voice in VOICES}
    machine = gain["exhaust"] * exhaust(firings) + gain["boom"] * boom(firings)
    machine += gain["clatter"] * over_ground(clatter(firings), width_hz=190)
    machine += gain["hiss"] * hiss(firings)
    machine += from_db(in_time(fan_level)[0]) * fan(firings, waver_db=3.5)
    machine += gain["bonnet"] * bonnet(firings)
    pin_ticks = pin(firings, share=.6, uneven_db=11.0, late_s=.005, width_hz=70, upper_db=-4)
    machine += from_db(in_time(PIN_LEVEL)[0]) * pin_ticks
    machine += knocks(firings, thud_rise_s=.003, ring_s=.011,
                      thud_gain_db=.4, ring_gain_db=0, panel_gain_db=-1.5)
    machine += throbs(gain_db=0) + clanks(gain_db=-1)
    twigs = snaps(crack_s=0.0027, rustle_s=0.077, grain_db=2.5,
                  ring_hz=7200, ring_width_hz=1500, ring_db=-8.0)
    left, right = machine + from_db(-7.5) * twigs
    return np.array([left, shaded(right)])


def record(dry):
    """Band limiting: a steep wind filter cuts the bass, faint noise is added, then the top is cut."""
    low_cut_hz, top_cut_hz, floor_db = 263.5, 15850, -83.5
    thin = signal.sosfilt(signal.butter(10, low_cut_hz, "high", fs=SR, output="sos"), dry)
    thin = thin + from_db(floor_db) * rng.standard_normal(N)
    return signal.sosfilt(signal.ellip(12, .1, 80, top_cut_hz, fs=SR, output="sos"), thin)


dry = scene()
out = record(dry)
bounce(out)
```